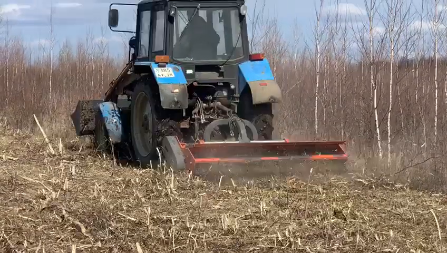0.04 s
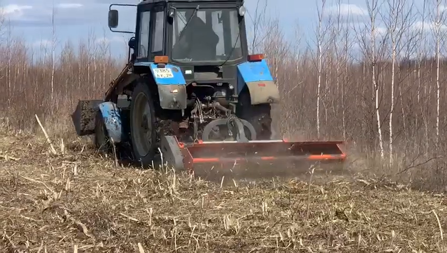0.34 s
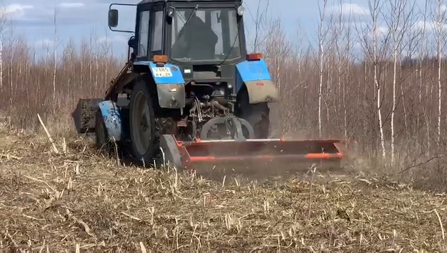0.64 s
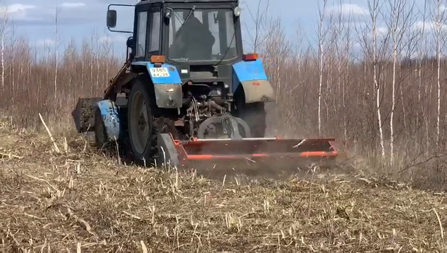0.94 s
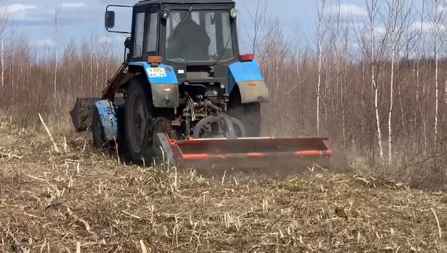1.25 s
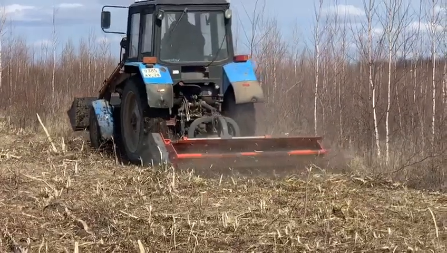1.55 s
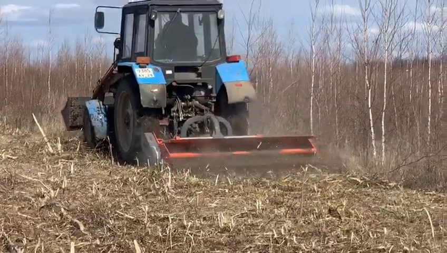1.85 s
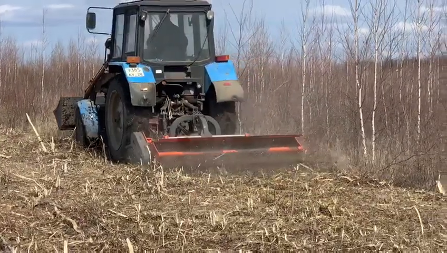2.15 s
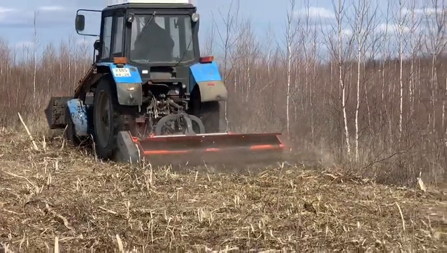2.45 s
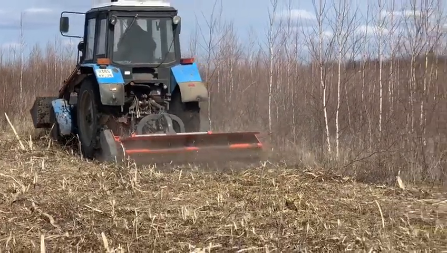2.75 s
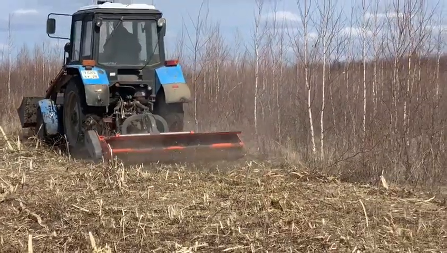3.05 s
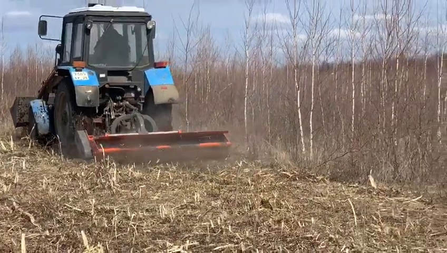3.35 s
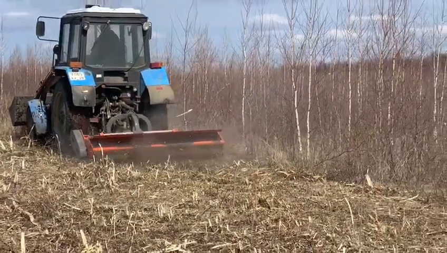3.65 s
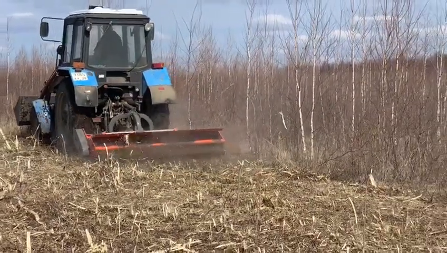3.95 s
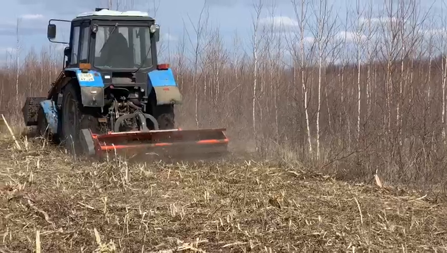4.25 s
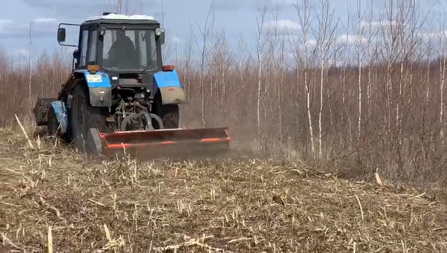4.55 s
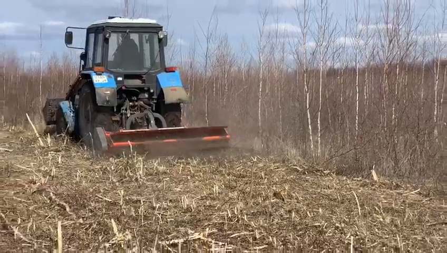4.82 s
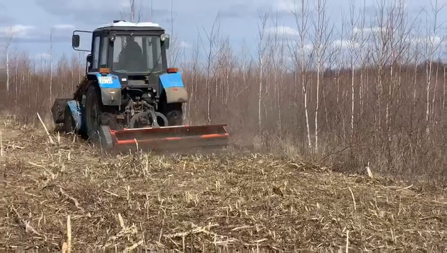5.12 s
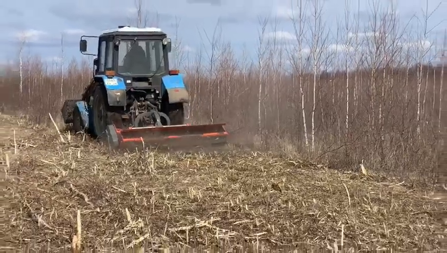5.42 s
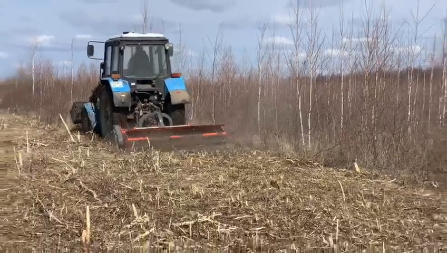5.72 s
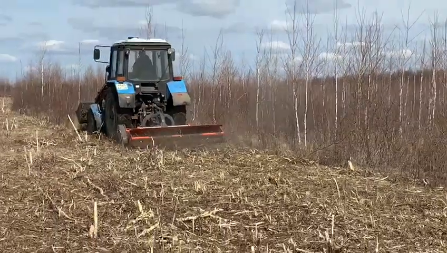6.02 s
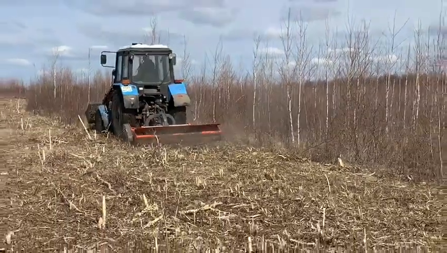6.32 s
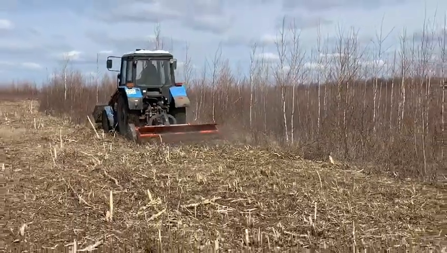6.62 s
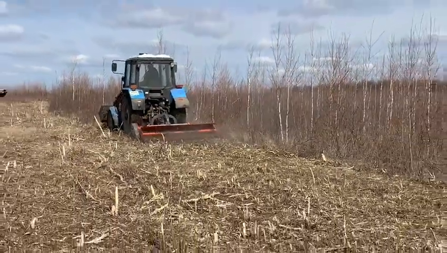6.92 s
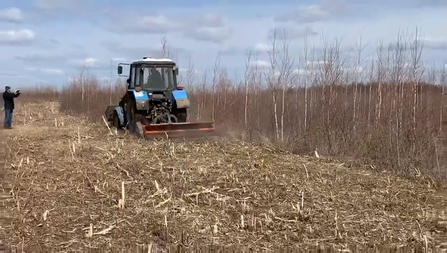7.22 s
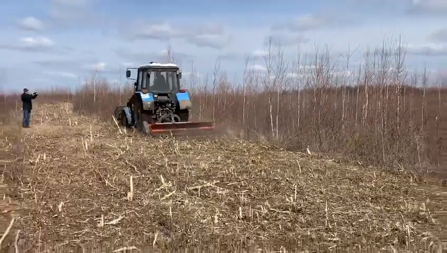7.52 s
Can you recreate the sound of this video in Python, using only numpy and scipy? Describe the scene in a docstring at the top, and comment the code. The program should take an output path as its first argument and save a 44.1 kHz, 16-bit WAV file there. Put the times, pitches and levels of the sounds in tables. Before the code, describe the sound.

A mulcher behind a diesel tractor shreds dry stems with continuous crackling and sharp snaps over a steady engine drone.

```python
"""A diesel drone and the crunch of dry brush: a four-cylinder tractor drags a flail mulcher over a field.
The periodic firing of the exhaust beats against the hum of the rotor, and both sag a little under load.
The flails fracture stems in showers of clicks and spray chips at the hood, whose steel resonates.
The thicket scatters faint echoes, and the colour of the sound shifts as the machine moves farther off.
Near the end the rotor digs into the ground and rumbles."""
import sys
import numpy as np
from scipy import signal
from scipy.fft import rfft, irfft, next_fast_len
from scipy.io import wavfile

SR = 44100
rng = np.random.default_rng(int(sys.argv[2]) if len(sys.argv) > 2 else 0)


def unload_audio(sound):
    """Save the sound as a 16-bit wav file, at the path given as the first command line argument."""
    columns = np.transpose(np.atleast_2d(sound))
    # keep every value between -1 and 1, then stretch to whole-number steps
    steps = np.round(np.clip(columns, -1, 1) * 32767)
    wavfile.write(sys.argv[1], SR, steps.astype(np.int16))


N = 338247
TIME = np.arange(N) / SR

FREE_ROTOR_HZ, FULL_LOAD_SAG_HZ = 35.86, .66
FLAIL_ROWS, FIRINGS_PER_TURN, GEAR_ORDER = 4, 1.931, 7.12
INERTIA_S, GOVERNOR_S = .16, .31  # time constants of the spinning mass and the fuel supply
STUBBLE_CRUNCH_DB, STUBBLE_SPLINTERS_DB, STUBBLE_CHIPS_DB = -30.5, -27.5, -27
FULL_LOAD_DB = -23  # the crunch level that loads the rotor fully
DIG_START_S, DIG_SINK_S, DIG_SURGE_S = 7.24, .04, .29
CUTOFF_HZ = 11560

# Weaker exhaust partials. Each row: multiple of the firing rate, level in dB.
EXHAUST_PARTIALS = [(.5, -32), (1.5, -35), (2.5, -21), (3, -15.5), (3.5, -47), (4, -24), (4.5, -26),
                    (5.5, -41)]
# Rotor partials beside the flail hum. Each row: multiple of the rotor speed, level in dB.
ROTOR_PARTIALS = [(2, -43), (3, -40), (5, -41), (6, -38), (7, -44.5), (8, -44.5), (9, -43.5), (12, -50.5)]
# The machine's retreat. Each row: time in seconds, position from 0 (near) to 1 (farther off).
RETREAT = [(0, 0), (1.7, .05), (2.5, .6), (3.2, .95), (7.67, 1)]
# Bushes going under the hood. Each row: start in seconds, length in seconds, clearing time constant in
# seconds, relative crunch level in dB, splinters in dB above the crunch, chips in dB above the crunch.
BUSH_PASSES = [(-0.13, 0.25, .09, -24, 1.5, -5), (0.101, 0.68, 0.14, -24, 3.5, -3),
               (0.804, 0.33, 0.24, -24, 4.5, -5), (1.248, 0.16, 0.1, -25.5, 3.5, 1.5),
               (1.467, 0.18, 0.056, -26, 3, -1), (1.878, 0.17, 0.092, -24.5, 4.5, 3),
               (2.065, 0.23, 0.076, -28, 5, 4.5), (2.238, 0.33, 0.069, -23.5, 5, 2),
               (2.55, 0.25, 0.048, -31.5, 6.5, 11.5), (2.8, 0.18, 0.097, -26.5, 7.5, 7),
               (3.04, 0.63, 0.14, -24, 4, 1), (3.82, 0.245, .012, -21.5, 3.5, -1),
               (4.009, 0.49, 0.1, -25.5, 2.5, -16), (4.658, 0.14, 0.076, -25, 7.5, -2),
               (4.952, 0.17, 0.18, -29, 8.5, 7.5), (5.221, 0.31, 0.083, -25.5, 5.5, 1),
               (5.418, 0.41, 0.1, -22, 2, -3.5), (5.806, 0.27, .09, -29, -4, 6),
               (6.116, 0.11, 0.067, -21.5, 3, 0), (6.217, 0.18, 0.024, -22, 2.5, -5),
               (6.843, 0.21, 0.035, -31, 3, 5), (7.143, 0.46, 0.095, -22, -0.5, -2)]
# Spectra of the noise sources. Each row: frequency in Hz, relative spectral level in dB.
CRUNCH_SPECTRUM = [(500, -24), (1120, -13), (1350, 0), (2200, 1.5), (2700, -1.5), (4000, -9), (8000, -25.5)]
SPLINTER_SPECTRUM = [(1500, -23), (2400, -1), (3000, -1), (4000, 2.5), (5400, -1.5), (6200, -0.5),
                     (7500, -3.5), (8600, 4), (11500, -31)]
CHIP_SPECTRUM = [(3500, -22), (5200, -6), (6800, -5), (7700, -3), (8200, 0), (9000, -2), (9700, -4.5),
                 (11500, -6)]
RUMBLE_SPECTRUM = [(15, -26), (38, -3), (70, -3.5), (110, 1.5), (160, 0), (200, 1.5), (280, 1), (345, -8.5),
                   (400, -6), (480, -11.5), (700, -32.5)]
CLATTER_SPECTRUM = [(300, -22), (480, -1.5), (650, 3), (900, -1), (1130, -3), (1600, -2), (3000, -29)]
BOOM_SPECTRUM = [(270, -32), (345, -8), (386, -1), (405, -3), (440, -13), (540, -30)]
SCRAPE_SPECTRUM = [(2400, -33), (3000, 0), (3350, 2), (4000, -30)]
SOIL_SPECTRUM = [(30, -24), (70, -3), (140, -8), (230, 3.5), (280, -1.5), (320, -7.5), (405, -1.5),
                 (500, -15.5), (800, -15.5), (1500, -38)]
# Broad resonances of the hood. Each row: centre in Hz, width in Hz, gain in dB.
HOOD_RESONANCES = [(1219, 156, 9), (1590, 130, 5), (1770, 150, -7.5), (2110, 160, 3), (2930, 160, 4.5),
                   (3780, 40, 6.5)]
# Ringing modes of hood and drum. Each row: frequency in Hz, time to fall 60 dB in seconds,
# gain in dB when near, gain in dB when farther off.
STEEL_RESONANCES = [(394, 0.089, -15, -12), (761, 0.32, 7, 5), (996.4, 0.16, 8.5, 0), (1342, 0.15, -14, 6),
                    (1569, 0.062, -20, -6), (1940, 0.087, -12, -2.5), (3100, 0.12, 4.5, -3),
                    (3210, 0.092, 4, -16), (3290, 0.09, -4, -12)]
# What the thicket scatters back. Each row: frequency in Hz, relative gain in dB.
SCATTER_SPECTRUM = [(100, -14), (400, -4), (1200, 0), (3800, -3), (5000, -18), (7000, -12), (8700, -4),
                    (11000, -26)]
# Thick stems snapping. Each row: start in seconds, level in dB before the envelope, band centre in Hz.
STEM_SNAPS = [(0.029, -14, 2880), (0.076, -9.5, 4020), (0.207, -12, 4200), (0.226, -16, 4200),
              (0.338, -12, 2800), (0.837, -8, 3890), (1.045, -10, 3530), (1.393, -11, 3200),
              (1.57, -14, 4000), (1.587, -20, 3030), (2.02, -21, 3050), (2.188, -8.5, 7550),
              (2.19, -13, 3200), (2.33, -18, 2587), (2.75, -14, 4000), (2.997, -18, 5950),
              (3.608, -13, 3480), (3.672, -28, 6050), (3.702, -16, 6045), (3.884, -10.5, 7500),
              (4.058, -18, 2694), (4.235, -11.5, 2500), (4.352, -13.5, 2980), (5.149, -25, 7150),
              (5.261, -16, 6930), (5.725, -14, 2177), (5.772, -10.5, 7030), (5.938, -20, 3490),
              (6.207, -13, 2260), (6.33, -14, 2980), (6.603, -14.5, 7510), (6.683, -19.5, 3000),
              (7.01, -18, 2011), (7.058, -16, 2553), (7.299, -8, 6040), (7.579, -9.5, 6640),
              (7.638, -12, 7240)]
# Wood jammed against the drum. Each row: centre in seconds, half length in seconds, level in dB.
WOOD_JAMS = [(0.527, 0.15, -30), (1.38, 0.052, -32.5), (3.383, .18, -32.5), (4.01, .05, -30.5),
             (4.177, 0.075, -28.5), (5.34, 0.092, -28.5), (5.621, 0.061, -26.5), (6.4, 0.066, -33)]
# Dense clumps of stems. Each row: centre in seconds, surge in dB.
STEM_CLUMPS = [(.675, 2.3), (.77, 0.5), (1.013, 1.5), (1.1, 2), (2.35, 2.5), (2.459, 2.5), (3.302, 3.5),
               (3.446, 4.5), (3.612, 0), (3.925, 3.5), (4.04, 0.5), (4.265, 3), (4.345, 4), (5.49, 0.5),
               (5.73, 1), (6.695, 2)]
# Stems dragged along the steel. Each row: centre in seconds, half length in seconds, drive level in dB.
STEM_SCRAPES = [(.87, 0.046, -23), (1.02, .06, -21), (1.14, 0.06, -18)]
# Clods hitting the hood. Each row: start in seconds, relative level in dB.
CLOD_HITS = [(2.969, -19.5), (3.279, -19.5), (3.985, -23), (4.025, -20), (6.212, -20), (7.056, -27),
             (7.282, -19)]
# Peaks and dips of the microphone. Each row: centre in Hz, width in Hz, gain in dB with the machine
# near, gain in dB with it farther off.
MIC_RESONANCES = [(4300, 150, -8, -11), (4720, 240, 6.5, 3), (4990, 110, -11, -7), (5300, 300, 2.5, 4.5),
                  (5680, 220, -4.5, -4.5), (6100, 300, 1.5, 2), (6540, 200, -9, -3.5), (6950, 300, 3.5, .5),
                  (7230, 220, -2.5, -1), (7550, 350, 6.5, .5), (7900, 120, -3, -7), (8400, 800, -4.5, 2),
                  (9600, 700, 4.5, -2)]
# Balance of the microphone ports. Each row: frequency in Hz, left minus right in dB.
PORT_BALANCE = [(60, -1.4), (160, -1.3), (330, .4), (560, -1.3), (1020, 1), (1300, -1.6), (1600, 0),
                (2000, .7), (2400, 0), (2850, -.7), (4000, 0), (5000, 0), (5800, -2.2), (6400, 0),
                (6850, -3), (7800, -.3), (8050, -3.8), (8650, -5.3), (9500, -.3), (10800, 0)]
# Phase between the ports, machine near and farther off. Each row: frequency in Hz, left lead in radians.
PORT_PHASE_NEAR = [(850, -.05), (1100, -.65), (1500, -.6), (1750, -.9), (2200, -.55), (2600, 0), (4250, 0),
                   (4450, 1.35), (4850, 0), (4990, 0), (5060, 3.0), (5400, 0), (5750, 0), (6150, .5),
                   (6500, .3), (6750, -3.1), (7900, -3.1), (8150, -2.8), (8400, 0), (10150, -.3),
                   (10350, -1.2), (10650, -3.1)]
PORT_PHASE_FAR = [(700, 0), (1700, -.35), (2400, 0), (2850, .5), (3400, .2), (4220, .1), (4400, 3.05),
                  (4750, 2.7), (5050, 3.1), (5600, 3.1), (5780, .8), (6100, 0), (6600, 0), (6900, -2.2),
                  (7250, -2.4), (7550, -.7), (7900, .2), (8750, .7), (9550, 0), (10150, -1.3),
                  (10450, -2.6), (10800, -3.1)]
# Left-right spread heard in each band, machine near and farther off; the deep dips have almost none.
# Each row: frequency in Hz, gain in dB of the left-right difference against the common part.
BAND_SPREAD_NEAR = [(300, -28), (700, -18), (1100, -11), (1600, -13), (1900, -9.5), (2350, -11),
                    (2600, -24), (4200, -26), (4450, -8), (4900, -17), (5300, -6), (5700, -19), (6550, -6),
                    (6850, -28), (7700, -24), (8000, -10), (8400, -2), (9000, -8.5), (9900, -15),
                    (10400, -5), (10800, -24)]
BAND_SPREAD_FAR = [(300, -28), (700, -21), (1200, -14), (2000, -15), (2450, -21), (2800, -10.5),
                   (3300, -11), (4200, -13), (4450, -12), (5100, -26), (5550, -23), (5750, -6), (6400, -17),
                   (6850, -4), (7300, -6), (8100, -9.5), (9400, -8), (10100, -5), (10800, -19)]


def from_db(db):
    """Amplitude grows tenfold for every 20 dB."""
    return 10 ** (np.asarray(db) / 20)


def rms_one(x):
    """Normalisation to unit mean power."""
    return x / np.sqrt(np.mean(x ** 2) + 1e-20)


def blend(when_near, when_far, far):
    """Linear interpolation between the near and the farther position."""
    return (1 - far) * when_near + far * when_far


def at_hz(points, hz):
    """Interpolation on a logarithmic frequency axis."""
    table_hz, value = np.transpose(points)
    return np.interp(np.log(np.maximum(hz, 1)), np.log(table_hz), value)


def resonance_db(modes, hz):
    """Lorentzian peaks and dips, summed in decibels."""
    return sum(db / (1 + (2 * (hz - centre) / width) ** 2) for centre, width, db in modes)


def colour(x, spectrum, modes=()):
    """Linear filtering by a spectrum and its resonances, normalised to rms 1."""
    size = next_fast_len(N + SR // 10)
    hz = np.arange(size // 2 + 1) * SR / size
    gain = from_db(at_hz(spectrum, hz) + resonance_db(modes, hz))
    return rms_one(irfft(rfft(x, size) * gain, size)[:N])


def drift(corner_hz, step=40):
    """Low-passed noise is a slow random fluctuation, here of rms 1."""
    pole = np.exp(-2 * np.pi * corner_hz * step / SR)
    noise = rng.standard_normal(N // step + 2002)
    slow = signal.lfilter([1], [1, -2 * pole, pole * pole], noise)[2000:]
    return np.interp(np.arange(N) / step, np.arange(len(slow)), rms_one(slow))


def die_away(kicks, t60_s):
    """Damping gives each impulse an exponential tail."""
    return signal.lfilter([1], [1, -from_db(-60 / (t60_s * SR))], kicks + 1e-18)


def swells(events):
    """Superposition of Gaussian envelopes, one for each event."""
    return sum(from_db(db) * np.exp(-((TIME - s) / half_s) ** 2) for s, half_s, db in events)


def tone(cycles):
    """Simple harmonic motion of rms 1."""
    return np.sqrt(2) * np.sin(2 * np.pi * cycles)


def exhaust(firings, firing_db, octave_db):
    """Periodic puffs give phase-locked harmonics; unequal cylinders add half orders."""
    def partial(order):
        return np.sqrt(2) * np.cos(2 * np.pi * order * firings)
    drone = partial(1) * (1 + .026 * drift(3) + .03 * drift(25))
    for order, db in EXHAUST_PARTIALS:
        drone += from_db(db) * partial(order) * (1 + .45 * drift(5.2))
    return from_db(firing_db) * drone + from_db(octave_db) * partial(2)


def rotor(turns, hum_db, gear_db):
    """Flails fan the air at the blade-passing frequency; imbalance and gears add their own partials."""
    hum = from_db(hum_db) * tone(FLAIL_ROWS * turns) * (1 + .089 * drift(11))
    for order, db in ROTOR_PARTIALS:
        cycles = order * turns + rng.random() + .11 * drift(3.3)
        hum += from_db(db) * tone(cycles) * (1 + .37 * drift(4.3))
    gears = tone(GEAR_ORDER * turns + .086 * drift(5.1)) * (1 + .3 * drift(8))
    return hum + from_db(gear_db) * gears


def brush(bite_s=.135):
    """Incoherent sources add in power: bushes over stubble set crunch, splinter and chip levels in dB."""
    power = from_db([[STUBBLE_CRUNCH_DB], [STUBBLE_SPLINTERS_DB], [STUBBLE_CHIPS_DB]]) ** 2
    for start_s, length_s, clear_s, db, dry_db, fine_db in BUSH_PASSES:
        bite = np.clip((TIME - start_s) / bite_s, 0, 1)
        clearing = np.exp(-np.maximum(TIME - start_s - length_s, 0) / clear_s)
        power = power + (from_db([[db], [db + dry_db], [db + fine_db]]) * bite * clearing) ** 2
    return 10 * np.log10(power)


def flail_blows(turns, spread_db=3.5):
    """A nearly periodic envelope: each flail row bites a random amount of wood, which cracks on briefly."""
    rows_passed = np.floor(FLAIL_ROWS * turns + .3 * drift(60))
    at = np.flatnonzero(np.diff(rows_passed) > 0)
    kicks = np.zeros(N)
    kicks[at] = from_db(spread_db * np.clip(rng.standard_normal(len(at)), -2, 2))
    return rms_one(die_away(kicks, t60_s=.058))


def cracks(per_s, spread_db, hiss):
    """Fracture as a Poisson process: clicks of unequal size over a hiss of smaller ones."""
    sizes = from_db(spread_db * np.minimum(rng.exponential(1, N), 3)) * rng.choice([-1, 1], N)
    clicks = rms_one(sizes * (rng.random(N) < per_s / SR))
    return rms_one(clicks + hiss * rng.standard_normal(N))


def shredding(turns, crunch_db, splinters_db, chips_db, far):
    """Brittle fracture, modulated by the flail blows: stems crunch, dry wood splinters, chips spray."""
    blows, surge_db = flail_blows(turns), clumps_db()
    crunch = colour(cracks(3000, 2.2, hiss=.7) * (1 + .34 * blows), CRUNCH_SPECTRUM, HOOD_RESONANCES)
    splinters = colour(cracks(2500, 1.1, hiss=1) * (1 + blows), SPLINTER_SPECTRUM, HOOD_RESONANCES)
    chips = colour(cracks(4000, 3.9, hiss=.67) * (1 + 3.4 * flail_blows(turns)), CHIP_SPECTRUM)
    # each level shifts with position and flickers by about 1 dB
    crunch *= from_db(crunch_db + surge_db + blend(0, -1.34, far) + drift(29))
    splinters *= from_db(splinters_db + surge_db + blend(-.2, -1.34, far) + drift(18))
    chips *= from_db(chips_db + .13 * surge_db + blend(.24, .74, far) + drift(26))
    return crunch + splinters + chips


def hood(firings, crunch_db, throb=.18, knock=.071):
    """Impacts of wood and clods make the hood rumble and clatter, amplitude-modulated by the firing."""
    pulse = np.cos(2 * np.pi * firings)
    rumble = colour(cracks(900, 2.1, hiss=.83) * (1 + throb * pulse), RUMBLE_SPECTRUM)
    clatter = colour(cracks(1500, 3.6, hiss=.91) * (1 + knock * pulse), CLATTER_SPECTRUM)
    above_stubble_db, thumps = crunch_db - STUBBLE_CRUNCH_DB, clods()
    rumble *= np.hypot(from_db(-27 + .35 * above_stubble_db), thumps)
    clatter *= np.hypot(from_db(-34 + .46 * above_stubble_db), thumps)
    return rumble + clatter


def stalks(turns, per_s=380, spread_db=2.5, ring_cycles=55, pitches=26):
    """Free vibration: each broken stalk ticks on the hood and rings at a pitch set by its length."""
    struck = rng.random(N) < per_s * flail_blows(turns) / SR
    sizes = struck * from_db(spread_db * np.clip(rng.standard_normal(N), -2, 2)) * rng.choice([-1, 1], N)
    pitch_index, ticks = rng.integers(0, pitches, N), 0
    for k, hz in enumerate(np.geomspace(1499, 4000, pitches)):
        radius, angle = from_db(-60 * hz / (ring_cycles * SR)), 2 * np.pi * hz / SR
        poles = [1, -2 * radius * np.cos(angle), radius ** 2]
        ticks += signal.lfilter([0, np.sin(angle)], poles, sizes * (pitch_index == k) + 1e-18)
    return rms_one(ticks)


def steel(drive, far):
    """Forced resonance: pelting keeps hood and drum ringing; which modes carry depends on position."""
    ringing = 0
    for hz, t60_s, near_db, far_db in STEEL_RESONANCES:
        radius = from_db(-60 / (t60_s * SR))
        poles = [1, -2 * radius * np.cos(2 * np.pi * hz / SR), radius ** 2]
        scale = (1 - radius ** 2) / 2  # unity gain at resonance
        mode = signal.lfilter([scale, 0, -scale], poles, drive)
        ringing += mode * from_db(blend(near_db, far_db, far))
    return ringing


def thicket(machine, count=14, level_db=-28):
    """Scattering from trunks and ground returns faint, dull echoes, different on each side."""
    echoes = np.zeros((2, N))
    scattered = np.std(machine) * colour(machine, SCATTER_SPECTRUM)
    for side in echoes:
        for lag in (rng.uniform(.004, .07, count) * SR).astype(int):
            side[lag:] += rng.choice([-1, 1]) * scattered[:-lag]
    return from_db(level_db) * echoes / np.sqrt(count)


def snaps(rise_s=.005, t60_s=.069, edge_ratio=1.41, size=8192):
    """Sudden release of strain: a thick stem breaks in one burst of cracks, in a band of its own."""
    out = np.zeros(N + size)
    fibres = np.pad(cracks(5000, 2.5, hiss=.62), (0, size), "wrap")
    age = np.arange(size) / SR
    envelope = np.minimum(age / rise_s, 1) * from_db(-60 * age / t60_s)
    for start_s, db, hz in STEM_SNAPS:
        at = int(start_s * SR)
        band = signal.butter(2, [hz / edge_ratio, hz * edge_ratio], "band", fs=SR, output="sos")
        burst = signal.sosfilt(band, fibres[at:at + size])
        out[at:at + size] += from_db(db) * rms_one(burst) * envelope
    return out[:N]


def booms():
    """Resonance of the drum: a hollow note swells while wood is jammed against it."""
    return colour(rng.standard_normal(N), BOOM_SPECTRUM) * swells(WOOD_JAMS)


def clumps_db(half_s=.036):
    """More fractures radiate more power: a clump swallowed at once makes a brief surge in level."""
    return sum(db * np.exp(-((TIME - s) / half_s) ** 2) for s, db in STEM_CLUMPS)


def scrapes():
    """Sliding friction of stems makes a band of noise that excites the high modes of the steel."""
    return colour(rng.standard_normal(N), SCRAPE_SPECTRUM) * swells(STEM_SCRAPES)


def clods(trim_db=-3.5):
    """Impact and damping: the envelope of the hood's response to each clod."""
    kicks = np.zeros(N)
    for start_s, db in CLOD_HITS:
        kicks[int(start_s * SR)] = from_db(db + trim_db)
    return die_away(kicks, t60_s=.19)


def soil(dig, level_db=-18.5):
    """Dense random impacts of soil round the drum merge into a low thudding as the rotor digs in."""
    return colour(cracks(500, 1.55, hiss=.93), SOIL_SPECTRUM) * from_db(level_db) * dig


def stereo_image(direct, across, echoes, far, size=1024):
    """Partial coherence: left and right differ in level and phase; some bands sound wide, some narrow."""
    hz, frame_s, frames = signal.stft(np.vstack([direct, across, echoes]), SR, nperseg=size)
    common, difference, scattered = frames[0], frames[1], frames[2:]
    hz, far = hz[:, None], np.interp(frame_s, TIME, far)
    phase = blend(at_hz(PORT_PHASE_NEAR, hz), at_hz(PORT_PHASE_FAR, hz), far)
    spread = from_db(blend(at_hz(BAND_SPREAD_NEAR, hz), at_hz(BAND_SPREAD_FAR, hz), far))
    modes = [(centre, width, blend(near_db, far_db, far))
             for centre, width, near_db, far_db in MIC_RESONANCES]
    side = np.array([.5, -.5])[:, None, None]  # left, right
    gain = from_db(resonance_db(modes, hz) + side * at_hz(PORT_BALANCE, hz))
    pair = (common + 2 * side * spread * difference) / np.hypot(1, spread)
    heard = gain * (pair * np.exp(1j * side * phase) + scattered)
    return signal.istft(heard, SR, nperseg=size)[1][:, :N]


def lagged(x, lag_s):
    """First-order relaxation towards x, starting settled."""
    pole = np.exp(-1 / (lag_s * SR))
    return signal.lfilter([1 - pole], [1, -pole], x, zi=[pole * x[0]])[0]


def scene():
    """Mechanical coupling: brush loads the rotor and slows the engine geared to it."""
    crunch_db, splinters_db, chips_db = brush()
    far = np.interp(TIME, *np.transpose(RETREAT))
    dig = np.clip((TIME - DIG_START_S) / DIG_SINK_S, 0, 1)
    dig_surge = dig * np.exp(-((TIME - DIG_START_S) / DIG_SURGE_S) ** 4)
    load = from_db(crunch_db - FULL_LOAD_DB) ** 2 - from_db(STUBBLE_CRUNCH_DB - FULL_LOAD_DB) ** 2
    strain = lagged(load, INERTIA_S)
    turns = np.cumsum(FREE_ROTOR_HZ - FULL_LOAD_SAG_HZ * strain) / SR
    firings = FIRINGS_PER_TURN * turns
    firing_db = blend(-22.5, -21.5, far) + 3.5 * dig_surge
    # the governor feeds fuel after the load rises, which strengthens the octave of the exhaust
    octave_db = -45 + 25 * np.minimum(lagged(strain, GOVERNOR_S), .85)
    hum_db = blend(-22.5, -20, far) - 6.5 * dig
    gear_db = blend(-34, -29, far)

    def mulching():
        thudding = hood(firings, crunch_db) + soil(dig)
        return thudding + shredding(turns, crunch_db, splinters_db, chips_db, far)
    cutting = mulching() + snaps() + stalks(turns) * from_db(crunch_db - 5.5)
    drone = exhaust(firings, firing_db, octave_db) + rotor(turns, hum_db, gear_db)
    machine = drone + cutting + steel(cutting + scrapes(), far) + booms()
    # stems break all across the wide drum, so a part of the cutting differs between left and right
    across = mulching()
    return stereo_image(machine, across, thicket(machine), far)


def record(dry):
    """Soft saturation rounds the highest peaks, and a steep low-pass filter limits the bandwidth."""
    rounded = dry / (1 + (dry / .9) ** 8) ** (1 / 8)
    return signal.sosfilt(signal.ellip(12, .1, 90, CUTOFF_HZ, fs=SR, output="sos"), rounded)


dry = scene()
out = record(dry)
unload_audio(out)
```